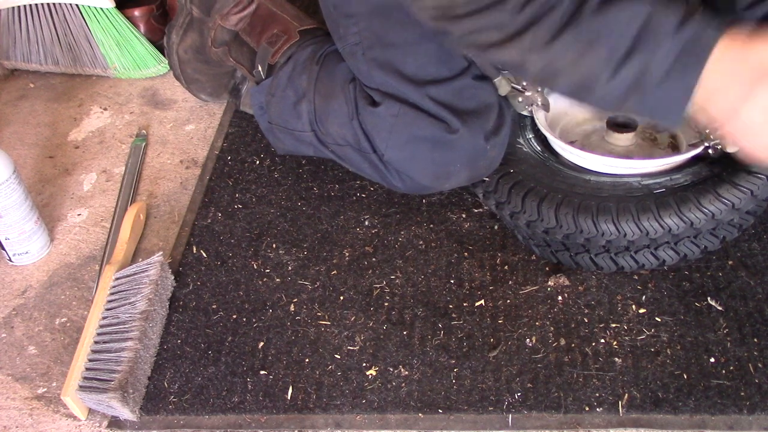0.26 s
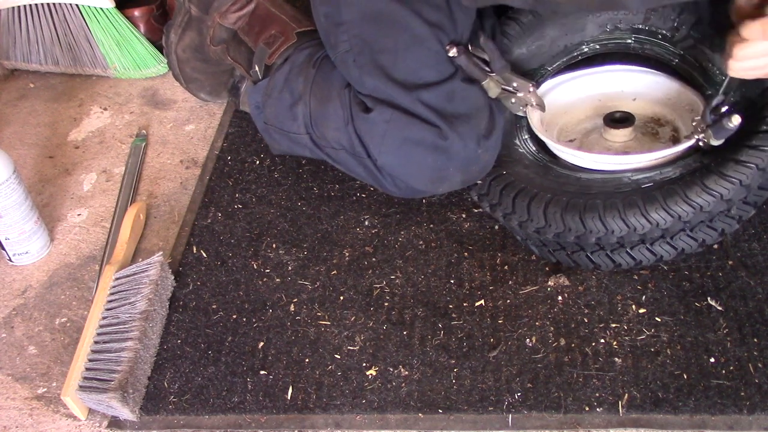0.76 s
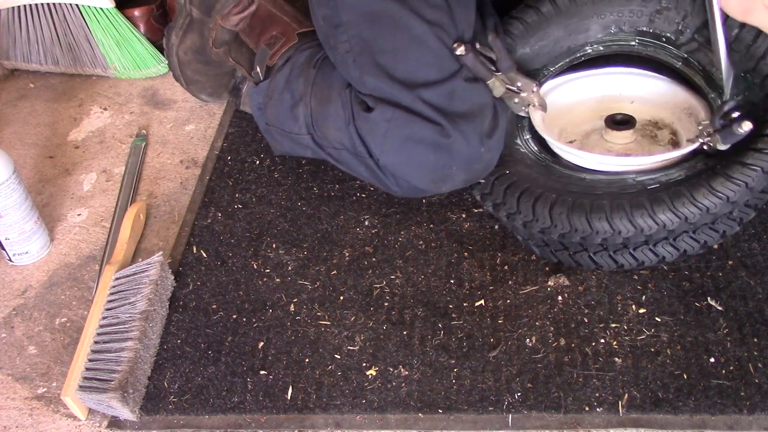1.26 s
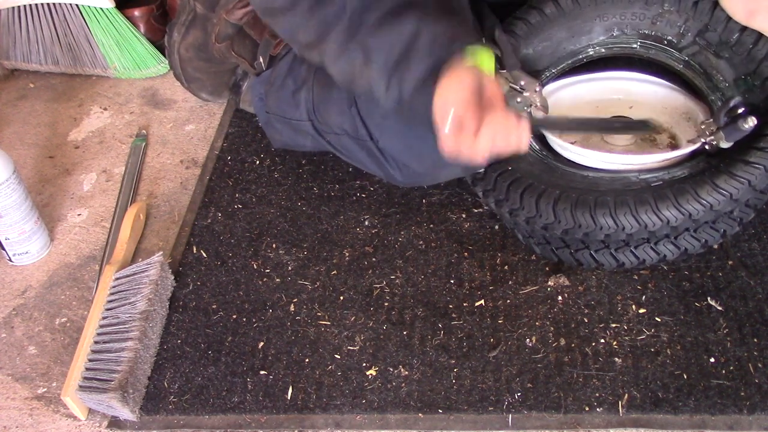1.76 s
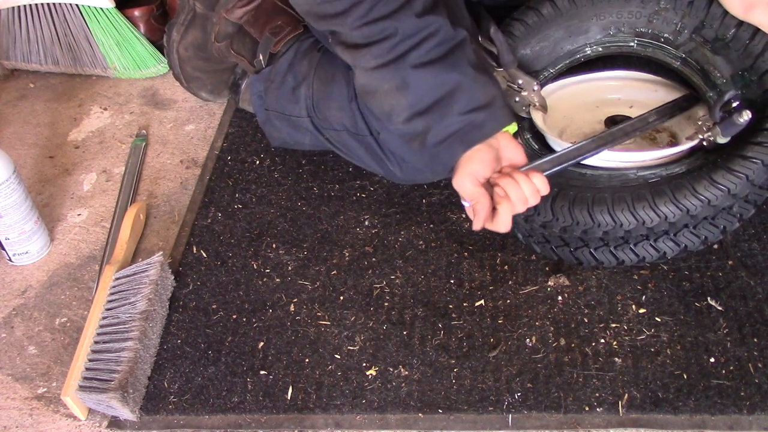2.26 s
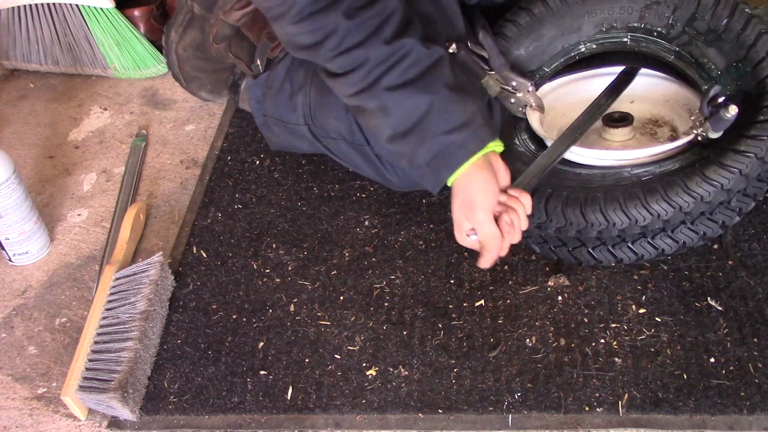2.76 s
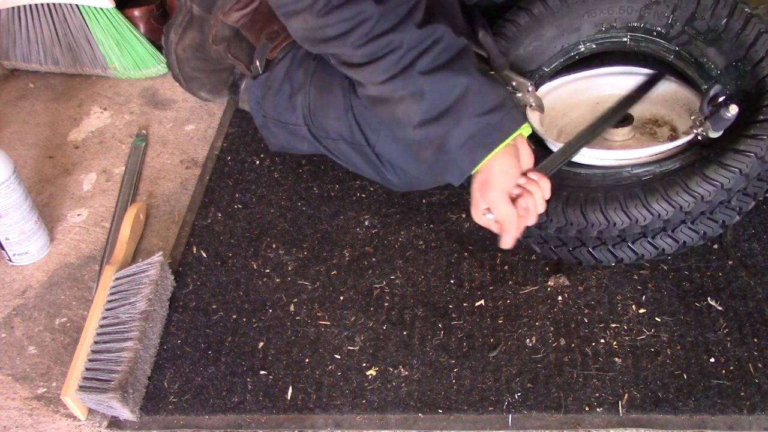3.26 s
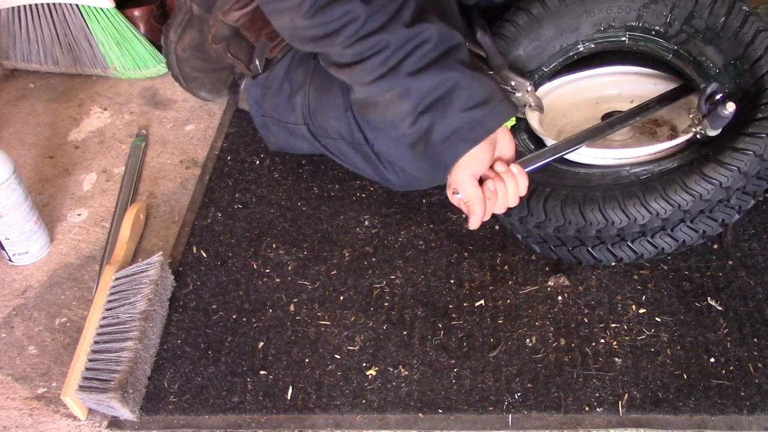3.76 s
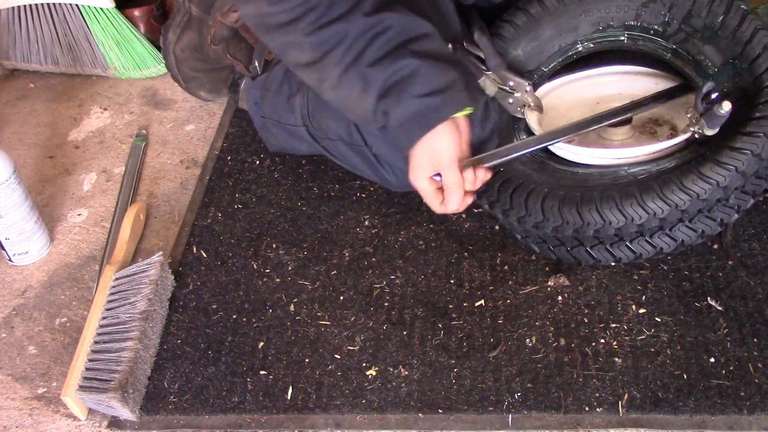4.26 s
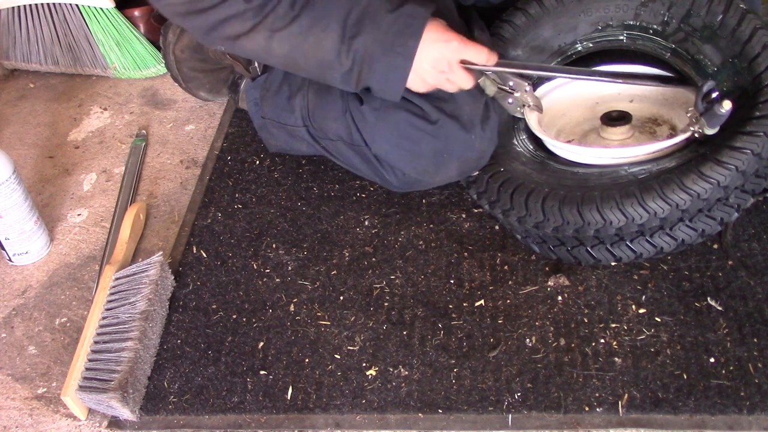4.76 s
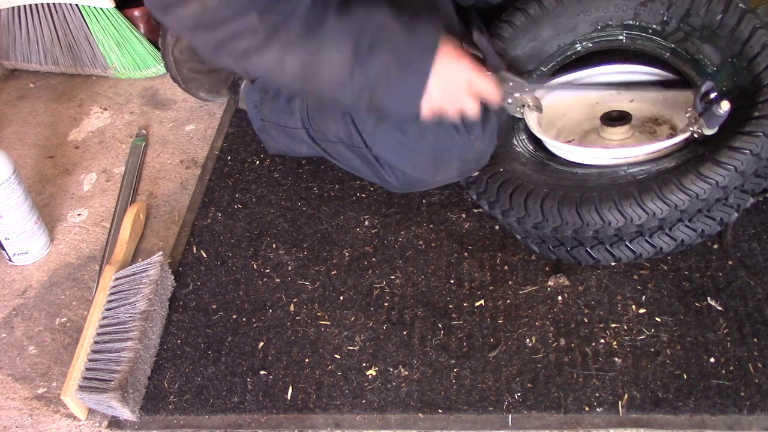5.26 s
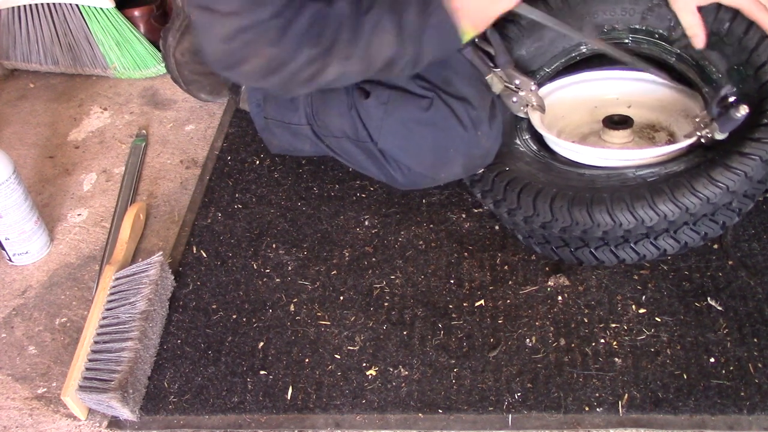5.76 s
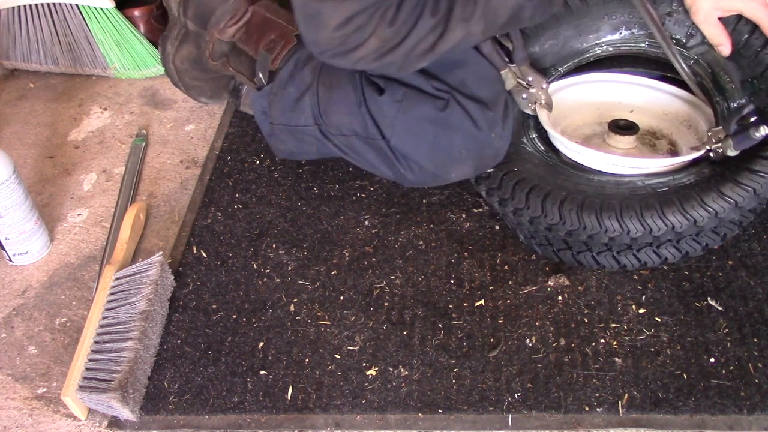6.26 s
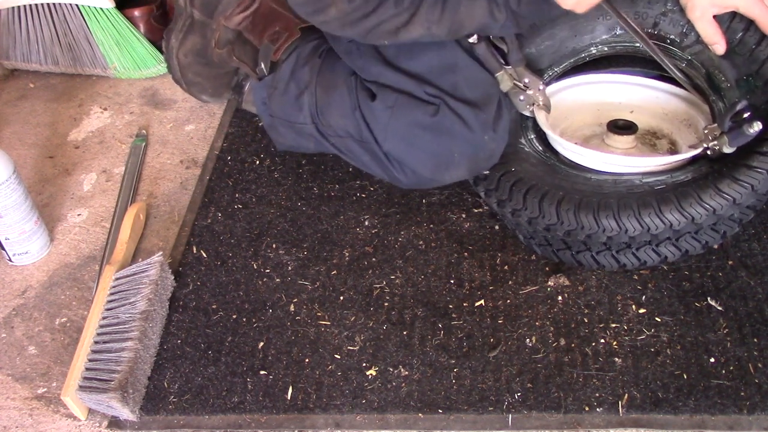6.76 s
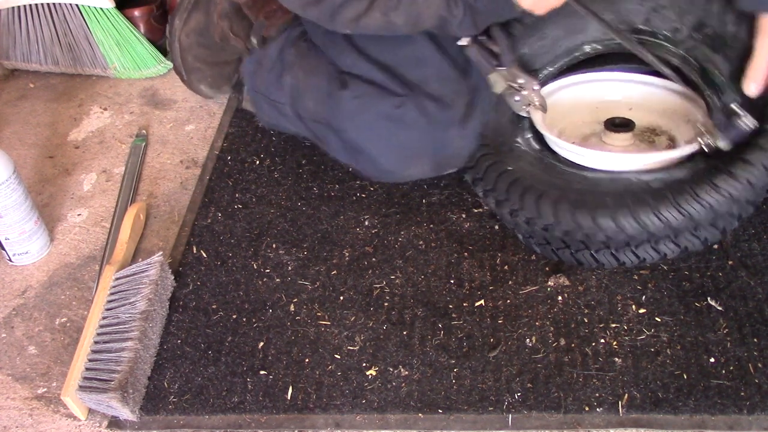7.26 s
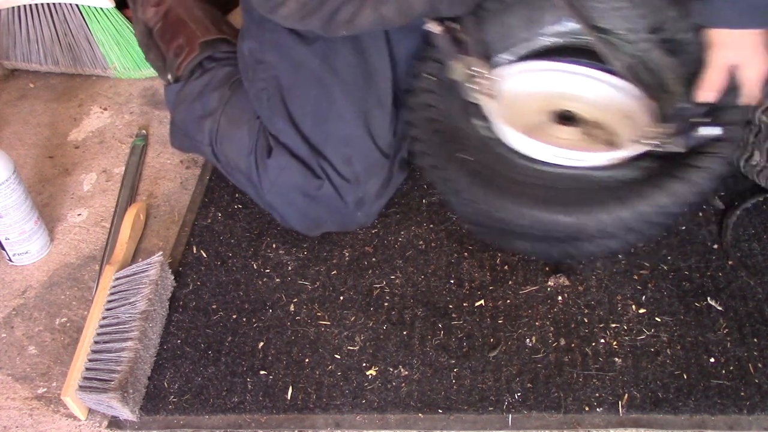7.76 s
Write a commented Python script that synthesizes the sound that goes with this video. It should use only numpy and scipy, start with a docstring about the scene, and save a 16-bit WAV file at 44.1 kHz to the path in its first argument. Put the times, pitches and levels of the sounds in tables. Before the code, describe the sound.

Steel lever clanks, clinks and scrapes on a small metal wheel in a garage, with tyre thumps, cloth rustle and a final gritty drag.

```python
"""A steel tyre lever knocks, scrapes and clinks on a small wheel lying on a mat: decaying modes plus clatter.
Around it the rubber tyre thumps, clothes rustle, grit snaps; at the end the wheel drags over the mat and squeaks.
These are shaped noise, except the thumps, which are modes.
A short garage echo follows the knocks, tyre thumps, scrapes along the rim and snaps.
A nearly mono camera microphone hears it over a low hush, a faint whine and a faint low-pitched side noise."""
import sys
import numpy as np
from scipy import signal
from scipy.fft import rfft, irfft, next_fast_len
from scipy.io import wavfile
from scipy.ndimage import uniform_filter1d

SR = 44100
rng = np.random.default_rng(int(sys.argv[2]) if len(sys.argv) > 2 else 0)


def bounce(signal):
    """Save signal as a 16-bit WAV file at the path given by the first command-line argument."""
    frames = np.transpose(np.atleast_2d(signal))
    limited = np.clip(frames, -1, 1)
    pcm = np.round(limited * 32767).astype(np.int16)
    wavfile.write(sys.argv[1], SR, pcm)


N = 353637


def amp(db):
    """dB to gain."""
    return 10 ** (np.asarray(db) / 20)


def unit(x):
    """Scale to rms 1."""
    return x / np.sqrt(np.mean(x ** 2) + 1e-20)


def along(points, hz):
    """Interpolate (f/Hz, value) points on a log frequency axis."""
    f, v = np.transpose(points)
    return np.interp(np.log(hz + 1), np.log(f + 1), v)


def gains(rows):
    """One gain per sample for each dB column; silent outside the table."""
    t = np.arange(N) / SR
    s, *columns = np.transpose(rows)
    inside = (t >= s[0]) & (t < s[-1])
    levels = amp([np.interp(t, s, column) for column in columns])
    return uniform_filter1d(inside * levels, size=256, axis=1)


def strokes(rows, edge):
    """Each stroke swells to its peak and fades, more pointed at higher edge; one gain row per dB column."""
    out = np.zeros((len(rows[0]) - 3, N))
    for start_s, length_s, peak, *db in rows:
        u = np.linspace(0, 1, round(length_s * SR))
        peak = np.clip(peak, .05, .95)
        ramp = np.minimum(u / peak, (1 - u) / (1 - peak))
        swell = np.sin(np.pi / 2 * ramp) ** edge
        out[:, round(start_s * SR):][:, :len(u)] += amp(db)[:, None] * swell
    return out


def filtered(x, response):
    """Apply a response of frequency by FFT."""
    m = next_fast_len(N + SR // 2)
    return irfft(rfft(x, m) * response(np.fft.rfftfreq(m, 1 / SR)), m)[..., :N]


def rush(spectrum, patchy_db, grain_db):
    """Coloured noise, rms 1, patchy in time and pitch; positive grain_db adds brief peaks, negative brief dips."""
    grain = np.repeat(rng.exponential(size=N // 16 + 1), 16)[:N]
    grains = rng.standard_normal(N) * amp(grain_db * grain)
    z = signal.stft(grains, nperseg=512)[2]
    field = uniform_filter1d(rng.standard_normal(z.shape), size=7, axis=0)
    field = uniform_filter1d(field, size=7, axis=1)
    x = signal.istft(z * amp(patchy_db * unit(field)), nperseg=512)[1][:N]
    return unit(filtered(x, lambda hz: amp(along(spectrum, hz))))


def ring(modes, t):
    """Damped sines at random strengths; each builds up over about a cycle and beats as with a close twin mode."""
    hz, db, t60 = np.transpose(modes)[:, :, None].astype(t.dtype)
    strength, beat, turn, phase = rng.standard_normal((4, len(modes), 1), dtype=t.dtype)
    db = db + 1.5 * strength
    twin = 1 + .3 * np.cos(150 * beat * t + 2 * turn)
    rise = 1 - np.exp(-t * hz / 0.44)
    decay = np.exp((db - 60 * t / t60) * t.dtype.type(np.log(10) / 20))
    return np.sum(decay * rise * twin * np.sin(6.2832 * hz * t + 2 * phase), axis=0)


# echo decay: f/Hz, t60/s
ECHO_T60 = [(150, 0.27), (500, 0.44), (2000, 0.38), (5000, 0.31), (12000, 0.12)]


def garage(x):
    """Each frequency of the echo dies at its own rate; a new random tail serves each quarter second."""
    out, hop = np.zeros(N + SR), SR // 4
    for start in range(0, N, hop):
        hz, t, z = signal.stft(rng.standard_normal(SR // 2), SR, nperseg=256)
        decay = amp(-60 * t / along(ECHO_T60, hz)[:, None])
        tail = signal.istft(z * decay, SR, nperseg=256)[1]
        wet = signal.fftconvolve(x[start:start + hop], tail / np.linalg.norm(tail))
        out[start + 200:][:len(wet)] += wet  # 200-sample delay
    return out[:N]


# side noise spectrum, relative: f/Hz, level/dB per Hz
SIDE_SPECTRUM = [(15, -48), (25, -12), (350, -2), (986, -7.5), (1930, -15.5), (3200, -31.5), (4160, -46),
                 (7040, -120)]


def side_noise():
    """A faint low-pitched noise, opposite in sign between the channels, which widens the stereo."""
    return amp(-66) * rush(SIDE_SPECTRUM, patchy_db=1.5, grain_db=1.8)


# hush spectrum, relative: f/Hz, level/dB per Hz
HUSH_SPECTRUM = [(15, -54), (25, -12.5), (161, -3.5), (373, -6.5), (489, -14.5), (591, -6), (775, -9),
                 (1160, -13), (1520, -14), (1740, -15), (2690, -16), (10100, -28.5), (11300, -27),
                 (13200, -34.5), (16000, -40)]


def hush():
    """Low, slightly patchy background noise."""
    return amp(-54.5) * rush(HUSH_SPECTRUM, patchy_db=2.0, grain_db=0.7)


def whine():
    """A faint high whine: noise in a narrow resonance, so slightly unsteady."""
    band = lambda hz: 1 / (1 + ((hz - 12930) / 60) ** 2)
    return amp(-86) * unit(filtered(rng.standard_normal(N), band))


# afterclang spectrum, relative: f/Hz, level/dB per Hz
CLANG_SPECTRUM = [(530, -20), (900, -2.5), (1420, -7), (2390, -23), (2790, -8), (3610, -18), (4570, -5),
                  (6900, -22), (10300, -21), (15000, -29)]


def afterclang():
    """A clash of tools a moment earlier still dies away in the garage: decaying coloured noise."""
    t = np.arange(N) / SR
    start_db, t60_s = -30.0, 0.33
    decay = amp(start_db - 60 * np.minimum(t, 1) / t60_s)
    return decay * rush(CLANG_SPECTRUM, patchy_db=3.0, grain_db=-1.5)


# cloth strokes: start t/s, length/s, peak position 0-1, level/dB
CLOTH_STROKES = [(.3, .16, 0.65, -59.5), (.5, 0.33, 0, -59), (.7, 0.66, 0.31, -54),
                 (1.1, 0.46, 0.35, -54.5), (1.5, 0.21, 0.25, -59), (2.36, 0.16, .8, -58),
                 (2.78, 0.29, 0.1, -59.5), (3.74, 0.11, 0.7, -63), (3.94, 0.6, 0.26, -56.5),
                 (4.2, .28, 0.84, -51), (4.46, 0.14, 0.5, -48), (4.65, 0.079, 0.6, -61),
                 (4.76, 0.14, 0.35, -56), (4.93, .23, 0.5, -49), (5.18, 0.12, 0.53, -46.5),
                 (5.34, .16, 1, -56), (5.58, 0.48, 0.13, -51), (6.04, .3, 0.16, -61.5),
                 (6.66, 0.19, 0.26, -58), (7.0, 0.13, 0.35, -55)]
# knees and shoes on the mat: t/s, level/dB
KNEE_LEVELS = [(0, -59), (0.36, -54.5), (1.12, -49), (1.32, -41), (1.49, -53), (1.85, -52), (2.2, -54.5),
               (2.9, -56.5), (3.06, -54.5), (3.54, -50.5), (3.94, -55.5), (4.36, -53), (4.58, -55.5),
               (5.34, -55.5), (5.62, -50.5), (6.02, -57), (6.41, -51.5), (6.81, -56.5), (7.1, -49)]
# spectra, relative: f/Hz, level/dB per Hz
RUSTLE_SPECTRUM = [(530, -3), (900, -4), (1620, -2), (2270, -8.5), (2960, -3.5), (5480, -12), (7770, -11),
                   (11600, -14), (16000, -31)]
SHUFFLE_SPECTRUM = [(29, -65), (50, -28), (76, -14), (296, -4), (372, -4.5), (494, -5.5), (1500, -30.5),
                    (1950, -43), (3300, -120)]


def clothes():
    """Stiff fabric hisses as it rubs; knees and shoes shuffle on the mat."""
    rustle = strokes(CLOTH_STROKES, edge=0.87)[0] * rush(RUSTLE_SPECTRUM, patchy_db=1, grain_db=1.5)
    shuffle = gains(KNEE_LEVELS)[0] * rush(SHUFFLE_SPECTRUM, patchy_db=1.5, grain_db=.5)
    return rustle + shuffle


# grit under tyre and shoes: t/s, level before band-pass/dB, centre f/Hz, t60/s
GRIT_SNAPS = [(.19, -46.5, 9300, 0.015), (.215, -52, 11000, .015), (.243, -50, 12000, .006),
              (.285, -52, 12000, .006), (2.464, -45, 7500, 0.0074), (6.52, -40.5, 2700, 0.06),
              (7.5785, -28.5, 7300, 0.0024), (7.759, -31, 12800, 0.036), (7.824, -23, 3700, 0.015),
              (7.878, -18.5, 3180, 0.005)]


def snaps():
    """A grain breaks: a click and a brief noise burst, band-passed around one pitch."""
    out, t = np.zeros(N + SR), np.arange(2048) / SR
    for s, db, hz, t60 in GRIT_SNAPS:
        burst = amp(-60 * t / t60) * rng.standard_normal(len(t)) + 3.4 * (t == 0)
        edges_hz = [.7 * hz, min(1.35 * hz, .49 * SR)]
        band = signal.butter(2, edges_hz, "band", fs=SR, output="sos")
        out[round(s * SR):][:len(t)] += amp(db) * signal.sosfilt(band, burst)
    return out[:N]


# wheel over mat: t/s, rumble level/dB, scrape level/dB
DRAG_LEVELS = [(7.1, -55, -68), (7.296, -31.5, -40), (7.432, -44, -58.5), (7.51, -55.5, -47),
               (7.57, -48.5, -60), (7.684, -50.5, -46.5), (7.754, -43, -42), (7.874, -40.5, -39.5),
               (7.95, -46, -51.5), (8.019, -57, -71)]
# spectra, relative: f/Hz, level/dB per Hz
RUMBLE_SPECTRUM = [(24, -76), (40, -30), (140, -8.5), (306, -1.5), (363, -6), (443, -1.5), (518, -12),
                   (1200, -20.5), (1560, -19.5), (2640, -120)]
SCRAPE_SPECTRUM = [(470, -10), (800, -8), (1350, -11), (1690, -5.5), (2310, -12), (2670, -7), (2960, -9.5),
                   (3840, -10), (6000, -26), (7800, -46), (13200, -120)]
HISS_SPECTRUM = [(2940, -29), (5000, -5), (5700, -7), (7940, -4), (13600, -14), (16000, -26)]
# rubber resonances: f/Hz, width/Hz, level/dB
SQUEAK_MODES = [(2620, 36, 0), (3780, 56, -2)]
# squeaks: start t/s, length/s, peak position 0-1, level/dB
SQUEAK_STROKES = [(7.63, 0.16, .4, -55), (7.79, .1, .4, -41)]


def drag():
    """The tread judders over the mat, rolls grit under it and squeaks in short streaks on the last pull."""
    rumble, scrape = gains(DRAG_LEVELS)
    low = rumble * rush(RUMBLE_SPECTRUM, patchy_db=2.0, grain_db=-1.0)
    coarse = rush(SCRAPE_SPECTRUM, patchy_db=1.5, grain_db=2.5)
    fine = rush(HISS_SPECTRUM, patchy_db=1.5, grain_db=1.5)
    grit = coarse + amp(-8) * fine

    def narrow(f):
        return sum(amp(db) * 1j * f * w / (hz * hz - f * f + 1j * f * w) for hz, w, db in SQUEAK_MODES)

    rub = rush([(1000, 0), (9000, 0)], patchy_db=3, grain_db=2)
    squeak = unit(filtered(rub, narrow))
    return low + scrape * grit + strokes(SQUEAK_STROKES, edge=1.56)[0] * squeak


# lever along rim: start t/s, length/s, peak position 0-1, grind level/dB, well ring level/dB
SLIDE_STROKES = [(1.11, 0.078, 0.77, -53, -45), (2.54, 0.24, .2, -50.5, -51),
                 (3.01, 0.062, 0.49, -37, -44.5), (3.05, 0.087, 0.34, -36, -53),
                 (3.14, 0.19, 0.38, -47, -58)]
# grind spectrum, relative: f/Hz, level/dB per Hz
GRIND_SPECTRUM = [(120, -51), (200, -10), (416, 4), (1210, -8), (1420, -7.5), (1590, -6), (3430, -1),
                  (4430, -4.5), (7970, -13), (16000, -25)]
# modes of clamp, rim edge, rim well (nominal): f/Hz, level/dB, t60/s
CLAMP_MODES = [(3400, -3, .07), (4620, -5, .06), (6135, -9, .15), (7650, -11, .09), (9405, -17, .14)]
EDGE_MODES = [(1795, -9, .22), (1846, 0, .14), (1890, -10, .25), (2011, -2, .18), (2035, -10, .3),
              (2350, -14, .08), (2890, -4, .06), (3395, -9, .12), (4032, -5, .07), (5200, -17, .17),
              (5800, -18, .12)]
WELL_MODES = [(1015, -6.5, 0.049), (1177, -2, 0.052), (1290, 1, 0.036), (1470, -18.5, 0.17)]


def slide():
    """Steel on steel: rough noise that also drives the modes of clamp, rim edge and well."""
    grind, well = strokes(SLIDE_STROKES, edge=1.56)
    rough = rush(GRIND_SPECTRUM, patchy_db=2.5, grain_db=1.5)
    t = np.arange(SR // 4, dtype=np.float32) / SR
    edge_ring = unit(signal.fftconvolve(rough, ring(CLAMP_MODES + EDGE_MODES, t))[:N])
    well_ring = unit(signal.fftconvolve(rough, ring(WELL_MODES, t))[:N])
    return grind * (rough + amp(-11.0) * edge_ring) + well * well_ring


# landing places: chatter/s, dish overtone tilt/(dB/octave), ring level/dB of dish, well, edge, lever, clamp
ON_DISH = (.048, -2.5, 0, -22, -16, -19, -18)
ON_SHOULDER = (0.07, -4.5, -0.5, -4.5, -17.5, -22, -20.5)
ON_WELL = (0.01, 1, -9, -1, -16.5, -18, -18)
ON_EDGE = (0.0657, 1.3, -0.5, -3, -3, -18, -12)
ON_SHAFT = (0.0636, -11, -2.5, -7.5, -18, -0.5, -7)
ON_CLAMP = (0.1, 9, -9, -22, -11, -35, -5)
ON_HUB = (0.0447, -11.5, 2, -16, -20, -25, -41)
ON_LIP = (0.01, 0.5, 0.5, -15, -38, -30, -22)
# contacts: t/s, steel level/dB, tyre level/dB, clatter level/dB, clatter treble at 9 kHz/dB (> 0 acts as 0), place
CONTACTS = [(0.0004, -17, -25.5, -33, 0, ON_HUB), (0.6812, -44.5, -39, -47, -18, ON_SHOULDER),
            (0.726, -44, -38, -50, -9, ON_DISH), (1.0732, -46, -28.5, -54, -6, ON_DISH),
            (1.2242, -31, -58, -27, -26, ON_WELL), (1.2569, -33.5, -19.5, -45, -21, ON_WELL),
            (1.2752, -52, -22.5, -61, -8, ON_DISH), (1.302, -22, -29, -14.5, -31, ON_LIP),
            (1.3793, -27.5, -21, -20.5, -38, ON_LIP), (1.4489, -37.5, -25.5, -51, -10, ON_DISH),
            (1.636, -49.5, -39.5, -65, -5, ON_SHOULDER), (1.703, -36, -55, -64, -20, ON_DISH),
            (1.722, -20, -30, -15, -18.5, ON_SHAFT), (2.032, -38.5, -29.5, -50, -11, ON_SHOULDER),
            (2.093, -31.5, -36, -12.5, -37.5, ON_SHOULDER), (2.146, -16, -54, -7.5, -21.5, ON_DISH),
            (2.4911, -14.5, -47, -7, -33, ON_EDGE), (2.6032, -25, -43, -49, -23, ON_HUB),
            (2.6917, -26, -22, -30, -30, ON_SHOULDER), (2.6974, -12, -11.5, -9.5, -3, ON_EDGE),
            (2.8793, -40, -49, -45, -8, ON_CLAMP), (3.0266, -36, -47, -39, -10, ON_CLAMP),
            (3.04, -29, -44, -50, -20, ON_WELL), (3.311, -38.5, -35, -39, -23, ON_DISH),
            (3.366, -22.5, -28, -12, -53, ON_SHOULDER), (3.4062, -21.5, -36, -25, -44, ON_HUB),
            (3.5513, -56, -40, -31, -21, ON_CLAMP), (3.6136, -29, -43.5, -33.5, -28, ON_HUB),
            (3.69, -31.5, -55, -37, -22, ON_HUB), (4.1308, -42, -55, -54, -13, ON_HUB),
            (4.153, -30.5, -41.5, -39, -31, ON_SHOULDER), (4.8084, -41, -37, -34, -9, ON_WELL),
            (5.4105, -37.5, -37, -46, -7, ON_WELL), (5.6108, -44, -65, -42, -19, ON_CLAMP),
            (5.646, -39.5, -39, -33, -21, ON_DISH), (5.754, -40, -36, -33.5, -21, ON_DISH),
            (6.3874, -34.5, -46, -48, -17, ON_WELL), (6.804, -41.5, -44.5, -46, 3, ON_DISH),
            (7.5331, -60, -34.5, -50, -15, ON_DISH)]
# modes of tyre, wheel dish, lever (nominal): f/Hz, level/dB, t60/s
TYRE_MODES = [(175, -6, .05), (252, 5, .1), (310, 1, .06), (365, -2, .05)]
DISH_MODES = [(425, 0, .26), (460, -3, .2), (558, -3, .14), (664, -5, .16), (795, -4, .12), (900, -11, .15)]
LEVER_MODES = [(625, -14, .1), (1658, -6, .2), (1723, 0, .33), (3370, -11, .3)]


def knocks():
    """Each contact chatters briefly and rings the parts it reaches, with a clatter of filtered noise on top."""
    out, t = np.zeros(N + SR), np.arange(SR // 3, dtype=np.float32) / SR
    f = np.fft.rfftfreq(len(t), 1 / SR)
    band = (1j * f / (700 + 1j * f)) ** 2 / (1 + 1j * f / 12500) ** 4
    for s, steel_db, tyre_db, clatter_db, treble_db, (chatter_s, tilt_db, *reach_db) in CONTACTS:
        root_hz = DISH_MODES[0][0]
        dish = [(hz, db + tilt_db * np.log2(hz / root_hz), t60) for hz, db, t60 in DISH_MODES]
        parts = (TYRE_MODES, dish, WELL_MODES, EDGE_MODES, LEVER_MODES, CLAMP_MODES)
        levels_db = [tyre_db, *np.add(steel_db, reach_db)]
        rung = sum(amp(db) * ring(modes, t) for db, modes in zip(levels_db, parts))
        # contact chatter dies away, slightly faster as it goes
        touch = amp(-60 * (t / max(chatter_s, .004)) ** 1.123)
        burst = (touch + 0.2 * amp(-60 * t / 0.0015)) * rng.standard_normal(len(t))
        steepness = max(-treble_db, 0) / (20 * np.log10(abs(1 + 9000j / 5000)))
        soft = band / (1 + 1j * f / 5000) ** steepness  # softer contact, less treble
        onset = 1 - np.exp(-t / 0.00013)
        clatter = amp(clatter_db) * irfft(rfft(burst) * soft, len(t)) * onset
        out[round(s * SR):][:len(t)] += rung * (0.21 + 0.68 * touch) + clatter
    # the knocks carry little deep bass
    return filtered(out[:N], lambda hz: (1j * hz / (100 + 1j * hz)) ** 2)


# knocks sit slightly right: f/Hz, side relative to knocks/dB
KNOCK_SIDE = [(300, -49), (2000, -26), (10000, -27)]


def scene():
    """Sum all sources into two channels that differ only a little."""
    blows = knocks()
    hits = blows + slide() + snaps()
    mid = hits + amp(-9) * garage(hits) + afterclang() + clothes() + drag()
    mid = mid + whine() + hush()
    side = side_noise() - filtered(blows, lambda hz: amp(along(KNOCK_SIDE, hz)))
    return np.array([mid + side, mid - side])


def record(dry):
    """The camera microphone keeps nothing above its band limit and little deep bass."""
    top_hz, bass_hz = 15800, 70
    return filtered(dry, lambda hz: (hz < top_hz) * (1j * hz / (bass_hz + 1j * hz)) ** 2)


dry = scene()
out = record(dry)
bounce(out)
```